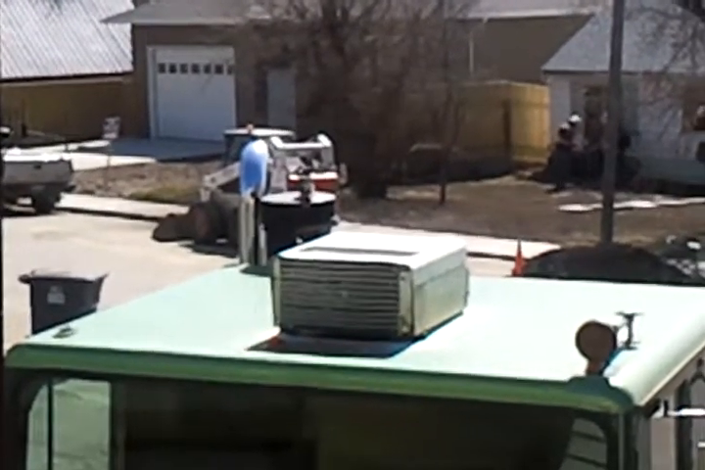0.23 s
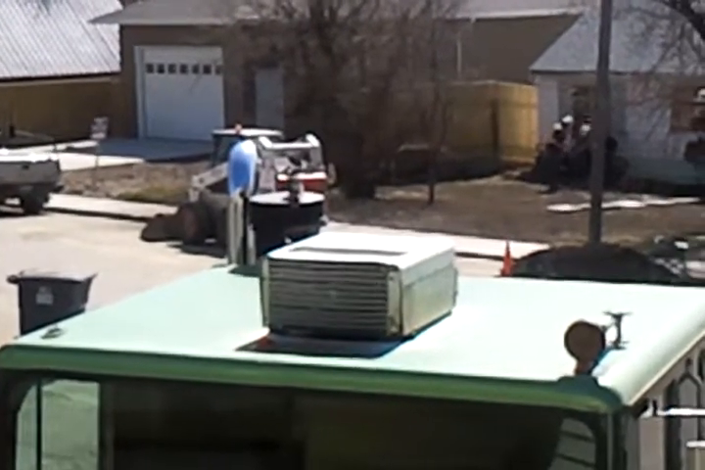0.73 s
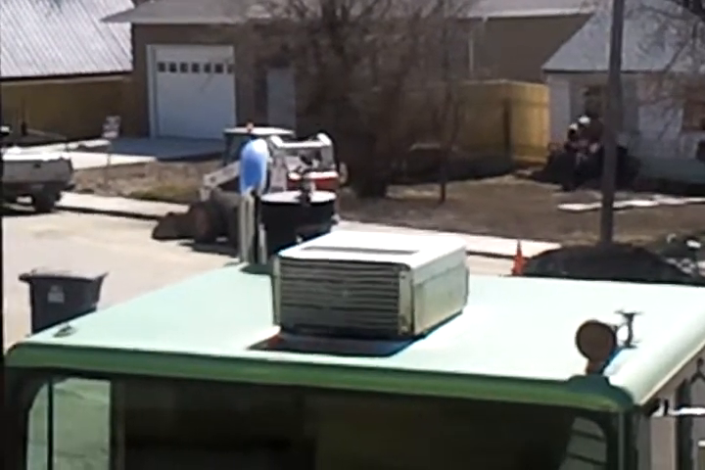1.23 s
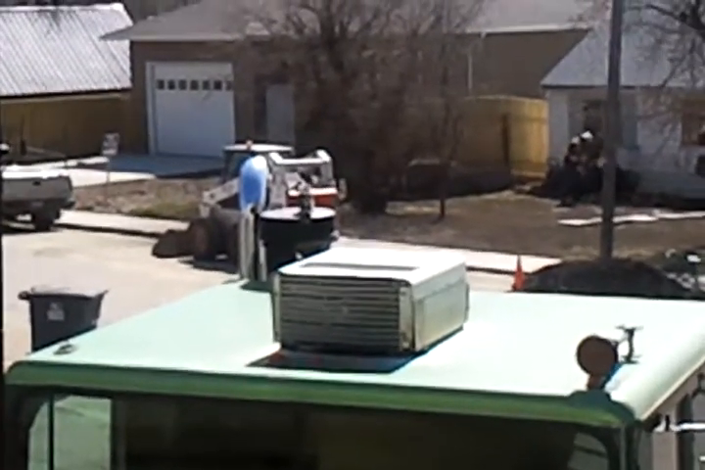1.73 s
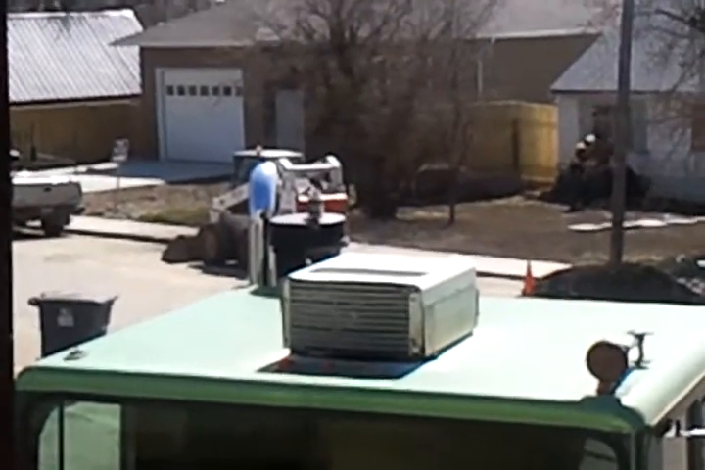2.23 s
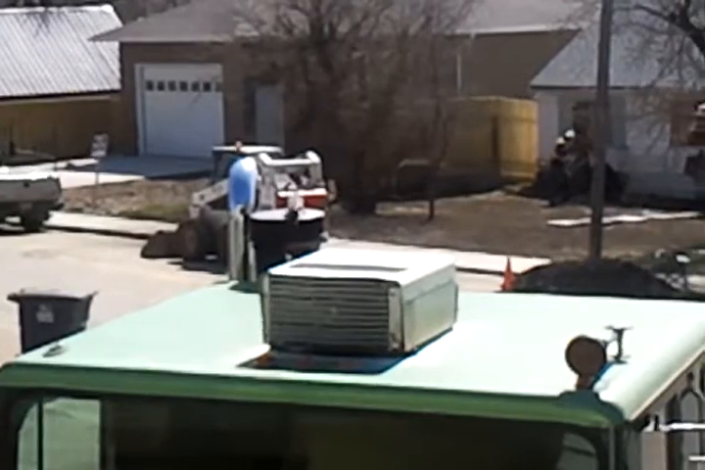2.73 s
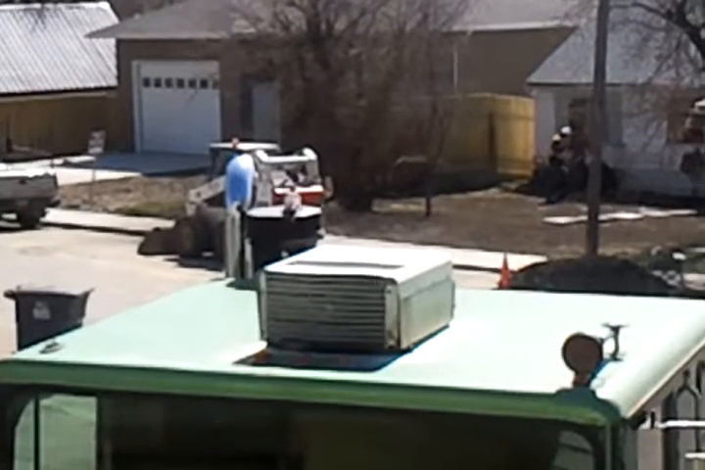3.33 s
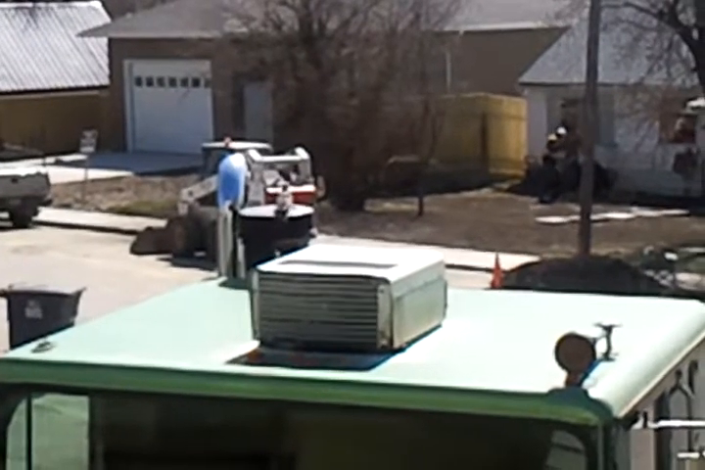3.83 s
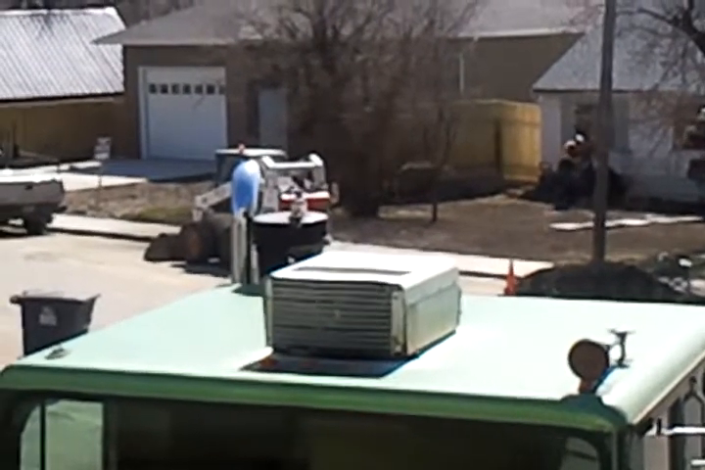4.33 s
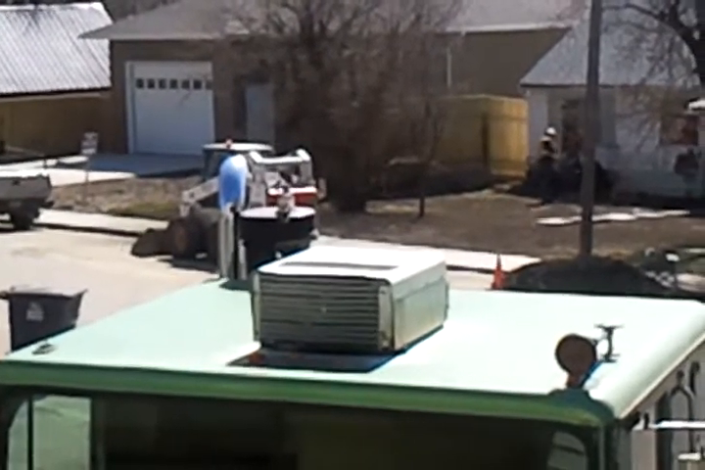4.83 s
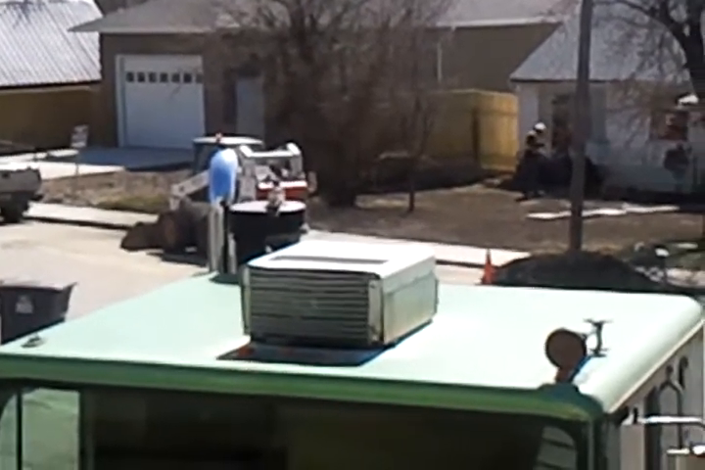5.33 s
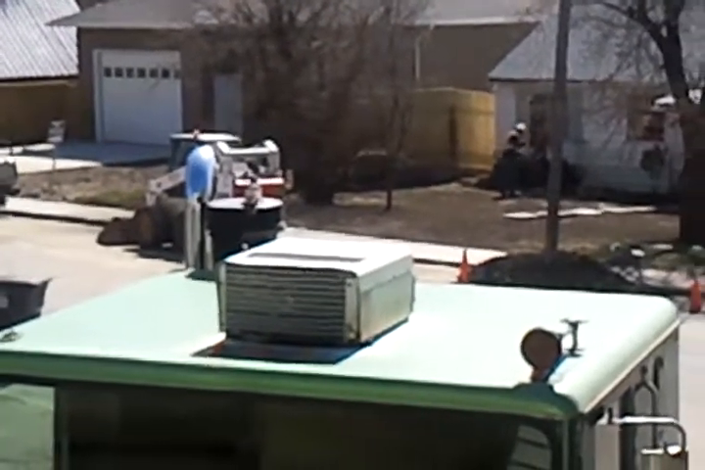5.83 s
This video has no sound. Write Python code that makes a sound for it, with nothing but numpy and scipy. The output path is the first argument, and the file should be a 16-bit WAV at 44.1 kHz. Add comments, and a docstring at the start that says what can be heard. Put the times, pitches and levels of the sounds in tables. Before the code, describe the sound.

A woodpecker taps a sheet-metal housing a few times, then hammers one loud, clanging half-second roll over distant traffic and faint birdsong.

```python
"""Distant traffic washes throughout; far birds chirp and wind puffs at the microphone now and then.
First a woodpecker pecks a sheet-metal housing on a truck roof: bright noise ticks plus small ringing modes.
Late echoes trail the two loudest pecks; feet shift with faint ticks; a short dry click follows at 2 s.
At 2.7 s it drums one loud half-second roll: each stroke rings the panel modes, a dense clang and a crack.
A faint peck comes after the roll. Roll and pecks echo from the ground and the house fronts."""
import sys
import numpy as np
from scipy import signal
from scipy.fft import rfft, irfft
from scipy.io import wavfile
from scipy.ndimage import uniform_filter1d

SR = 44100
rng = np.random.default_rng(int(sys.argv[2]) if len(sys.argv) > 2 else 0)


def unload_audio(sound):
    """Save the sound as a 16-bit wav file, at the path given as the first command line argument."""
    columns = np.transpose(np.atleast_2d(sound))
    # keep every value between -1 and 1, then stretch to whole-number steps
    steps = np.round(np.clip(columns, -1, 1) * 32767)
    wavfile.write(sys.argv[1], SR, steps.astype(np.int16))


N = 268172
TIME = np.arange(N) / SR
RING_TIME = TIME[:SR]   # each strike rings for 1 s at most


# Panel modes of the housing. Each row: frequency in Hz, relative level in dB, t60 in s.
PANEL_MODES = [(425, -39, 0.25), (570, -37.5, 0.7), (632, -36.5, 0.6), (661, -39, 0.5), (777, -34.6, 0.65),
               (831, -39.3, 0.65), (861, -33, 0.6), (943, -38, 0.8), (978, -43, 0.7), (1003, -40.6, 0.8),
               (1187, -40.5, 0.65), (1283, -34.5, 0.7), (1321, -24.5, 0.33), (1343, -27, 0.37),
               (1521, -28, 0.33), (1669, -40.5, 0.4), (1793, -31, 0.5), (1850, -29, 0.32),
               (2121, -31, 0.24), (2466, -39.5, 0.4), (2508, -40, 0.32), (2845, -45, 0.35),
               (3255, -51, 0.5), (3671, -44, 0.33), (4205, -41, 0.2), (4676, -50, 0.22), (5150, -53, 0.16),
               (5672, -55, 0.3), (5990, -56, 0.3), (6419, -53, 0.33)]
# Spectrum of its dense weaker modes. Each row: frequency in Hz, relative density in dB per Hz.
CLANG_SPECTRUM = [(250, -14.5), (400, -5), (500, -13), (650, -4.5), (900, -8), (1100, -9.5), (1600, -5),
                  (1900, -3.5), (2300, -7), (3200, -19), (4200, -17.5), (6500, -35.5), (7500, -23.5)]
# Colour of beak noise, in strokes and pecks. Each row: frequency in Hz, relative density in dB per Hz.
BEAK_SPECTRUM = [(1200, -25.5), (2000, -8), (2400, -8), (2950, -8), (3400, -7.5), (4000, 0.5), (5100, 2),
                 (5900, 0.5), (6400, -1), (6900, -2.5), (7600, -26), (9000, -16)]


def drum_roll(panel_db=-1.0, treble_db=1.5, clang_db=-30.5, scatter_db=-35.0, crack_db=-42.5,
              crack_t60_s=0.14, panel_rise_s=0.003, contact_rise_s=0.00074, valley_db=-10.0, cluster_hz=52.7):
    """Every stroke hits the same spot, so its ring adds to or cancels what still rings from earlier ones."""
    mode_hz, mode_db, t60_s = np.transpose(PANEL_MODES)
    # neighbouring modes start in opposite directions, so close pairs beat
    turn = np.arange(len(mode_hz)) / 2 + rng.normal(0, 0.12, len(mode_hz))
    decays = np.array([fade(t60) for t60 in t60_s])
    modes = decays * np.sin(2 * np.pi * (mode_hz[:, None] * RING_TIME + turn[:, None]))
    # a harder contact mostly feeds the high modes: 0 up to 1500 Hz, 1 from 6000 Hz
    high = np.clip(np.log(mode_hz / 1500) / np.log(4), 0, 1)
    clang = clustered(CLANG_SPECTRUM, valley_db, cluster_hz)
    crack_spectrum = clustered(BEAK_SPECTRUM, valley_db / 2, cluster_hz)
    weak_modes = from_db(clang_db) * dense_ring(clang)
    build_up = 1 - np.exp(-RING_TIME / panel_rise_s)   # bending waves need a moment to fill the box
    contact = 1 - np.exp(-RING_TIME / contact_rise_s)
    out = np.zeros(N)
    for start_s, force_db, bright_db in strokes():
        treble = high * (treble_db + bright_db + rng.normal(0, 1.2, len(mode_hz)))
        panel = from_db(panel_db + mode_db + treble) @ modes
        scatter = from_db(scatter_db) * dense_ring(clang)   # the beak never lands quite alike
        crack = from_db(crack_db + bright_db) * noise(crack_spectrum, size=SR) * fade(crack_t60_s)
        ring = build_up * (panel + weak_modes + scatter)
        add(out, start_s, from_db(force_db) * ring + contact * crack)
    return out


# Beak strokes, about 23 a second and quickening slightly. Each row: start in seconds, force in dB.
ROLL_STROKES = [(2.7378, 0.5), (2.7825, -1.5), (2.8271, -1.5), (2.8710, 0), (2.9128, -2), (2.9566, 0.5),
                (2.9987, 0), (3.0410, -0.5), (3.0835, -2.5), (3.1265, 0), (3.1695, -2.5), (3.2104, -1.5),
                (3.2510, -0.5)]


def strokes(bright_db=1.0, glancing_db=-10.5, glancing_from=9):
    """Start, force and brightness of each stroke; late in the roll every other one lands duller."""
    rows = []
    for k, (start_s, force_db) in enumerate(ROLL_STROKES):
        glancing = k >= glancing_from and k % 2 == 1
        rows.append((start_s, force_db, bright_db + glancing_db * glancing))
    return rows


def clustered(spectrum, valley_db, width_hz):
    """The weak modes crowd around the panel modes and thin out between them."""
    hz = np.geomspace(spectrum[0][0], spectrum[-1][0], num=900)
    distance_hz = np.min(np.abs(hz[:, None] - np.array(PANEL_MODES)[:, 0]), axis=1)
    # width_hz holds at 1 kHz and grows with the root of frequency
    near = np.exp(-(distance_hz / (width_hz * np.sqrt(hz / 1000))) ** 2)
    return np.c_[hz, at_hz(spectrum, hz) + valley_db * (1 - near)]


# Decay of the dense modes. Each row: frequency in Hz, t60 in s.
CLANG_DECAY = [(400, 0.74), (1000, 0.98), (2000, 0.42), (4000, 0.52), (7000, 0.23)]


def dense_ring(spectrum):
    """Close-packed modes, each frequency band dying at its own rate."""
    modes = rfft(noise(spectrum, size=SR))
    hz = np.arange(SR // 2 + 1)
    edges_hz = np.geomspace(150, 12000, 14)
    out = np.zeros(SR)
    for low, high in zip(edges_hz, edges_hz[1:]):
        band = irfft(modes * (hz >= low) * (hz < high), SR)
        out += band * fade(at_hz(CLANG_DECAY, np.sqrt(low * high)))
    return out


# Pecks, and the late echoes that follow the two loudest at 1.015 and 1.4716 s.
# Each row: start in seconds, relative level in dB.
PECKS_AND_LATE_ECHOES = [(0.102, -25), (0.414, -9), (0.629, -23.5), (0.725, -21.5), (0.842, -20),
                         (0.928, -18), (1.015, -2), (1.067, -17.5), (1.125, -22.5), (1.4716, -5),
                         (1.5997, -21.5), (2.579, -19.5), (3.601, -29)]
# Small, high modes of a light peck. Each row: frequency in Hz, width in Hz (wider dies sooner),
# relative level in dB.
SMALL_MODES = [(2394, 11, 2), (2420, 53, -19), (2920, 100, 8.5), (3500, 5, -13.5), (3920, 46, -3.5),
               (3700, 30, 6), (4460, 36, -38), (4960, 59, 0), (5530, 28, 3), (6170, 67, 4),
               (6500, 21, -3.5), (6640, 18, -20)]


def pecks(tick_db=-23.5, ring_db=-41.0, peck_t60_s=0.1, ring_longer=1.46, contact_rise_s=0.00071,
          snap_gain=0.86, snap_s=0.0018, click_at_s=2.0, click_db=-6, click_t60_s=0.0076):
    """A light touch gives a bright tick and a short ring; late echoes and the click are made alike."""
    sounds = [(start_s, db, peck_t60_s) for start_s, db in PECKS_AND_LATE_ECHOES + claw_ticks()]
    sounds.append((click_at_s, click_db, click_t60_s))
    snap = 1 + snap_gain * np.exp(-RING_TIME / snap_s)   # the first instant is harder than the ring
    contact = 1 - np.exp(-RING_TIME / contact_rise_s)
    out = np.zeros(N)
    for start_s, db, t60_s in sounds:
        ring = np.zeros(SR)
        for hz, width_hz, mode_db in SMALL_MODES:
            gain = from_db(mode_db + rng.normal(0, 2.5))
            tone = np.sin(2 * np.pi * (hz * RING_TIME + rng.random()))
            ring += gain * tone * fade(ring_longer * t60_s * np.sqrt(40 / width_hz))
        tick = noise(BEAK_SPECTRUM, size=SR) * fade(t60_s) * snap
        tick_and_ring = from_db(tick_db) * tick + from_db(ring_db) * ring
        add(out, start_s, from_db(db) * contact * tick_and_ring)
    return out


def claw_ticks(count=6, from_s=0.75, to_s=0.85, level_db=-24.5, scatter_db=2.5):
    """Faint, uneven ticks as the bird shifts its feet: (start in seconds, relative level in dB)."""
    step, strength = rng.uniform(-1, 1, (count, 2)).T
    start_s = np.linspace(from_s, to_s, count) + step * (to_s - from_s) / count / 2
    return list(zip(start_s, level_db + scatter_db * strength))


# Echoes from the ground and the house fronts. Each row: delay in seconds, relative level in dB.
STREET_ECHOES = [(.0151, -10), (.052, -9.5), (.087, -16), (.128, -14)]


def street(x, echo_db=-5.0, wall_hz=4000.0):
    """A few echoes come back from the ground and the houses, dulled by a gentle lowpass."""
    lowpass = signal.butter(1, wall_hz, fs=SR, output="sos")
    dull = signal.sosfilt(lowpass, x + 1e-18)
    out = x.copy()
    for delay_s, db in STREET_ECHOES:
        add(out, delay_s, from_db(db + echo_db) * dull)
    return out


# A small bird's call, a flick up that falls to a lower note. Each row: seconds into the unstretched call,
# pitch as a share of the call's reference pitch, relative level in dB.
CALL_CONTOUR = [(0, .82, -13), (0.018, .95, -2), (.03, 0.91, -5), (.042, 1.17, -7), (.055, 0.95, -8),
                (.075, .79, 2), (0.093, .79, -1.5), (.12, 0.56, -17)]
# Its calls. Each row: start in seconds, reference pitch in Hz, stretch of the contour, relative level in dB.
CALLS = [(-.05, 4500, 1.2, -47), (1.838, 5140, 0.87, -51.5), (3.815, 4450, 0.38, -37.5),
         (3.868, 4290, 0.246, -40.5), (4.775, 4670, 0.94, -51.5), (5.046, 4690, 0.6, -51.5),
         (5.578, 4650, 0.82, -52)]
# Soft whistles of other birds. Each row: start in seconds, length in seconds, first pitch in Hz,
# relative level in dB.
SOFT_WHISTLES = [(0.619, 0.0514, 2850, -46), (.765, 0.069, 2880, -45.5), (1.421, 0.059, 2750, -49),
                 (4.42, 0.43, 3840, -56)]


def birds(call_waver_hz=138.0, whistle_waver_hz=152.3, whistle_sag=0.049, scatter_db=-1.5, yard_t60_s=0.44):
    """Two-note calls and slightly sinking whistles, smeared by trees and walls on their long way."""
    out = np.zeros(N)
    shape_s, shape_ratio, shape_db = np.transpose(CALL_CONTOUR)
    for start_s, top_hz, stretch, db in CALLS:
        t = np.arange(int(shape_s[-1] * stretch * SR)) / SR / stretch
        level = from_db(db + np.interp(t, shape_s, shape_db))
        pitch_hz = top_hz * np.interp(t, shape_s, shape_ratio)
        add(out, start_s, level * whistle(pitch_hz, call_waver_hz))
    for start_s, length_s, hz, db in SOFT_WHISTLES:
        along = np.linspace(0, 1, int(length_s * SR))
        level = from_db(db) * np.sin(np.pi * along)
        pitch_hz = hz * (1 - whistle_sag * along)
        add(out, start_s, level * whistle(pitch_hz, whistle_waver_hz))
    yard = rng.standard_normal(SR) * fade(yard_t60_s)
    smeared = signal.fftconvolve(out, yard / np.linalg.norm(yard))[:N]
    return out + from_db(scatter_db) * smeared


def whistle(pitch_hz, waver_hz):
    """A near-pure tone that wavers about its pitch; waver_hz is the rms deviation."""
    waver = waver_hz * rms_one(uniform_filter1d(rng.standard_normal(len(pitch_hz)), size=60))
    return np.sin(2 * np.pi * np.cumsum(pitch_hz + waver) / SR)


# Gusts. Each row: peak time in seconds, length in seconds (between the 1/e points of power), level in dB.
WIND_PUFFS = [(0.005, 0.051, -41.5), (0.242, 0.02, -34.5), (0.311, 0.039, -39), (1.074, 0.048, -41),
              (1.396, 0.065, -41), (2.045, 0.043, -30.5), (2.163, 0.028, -29.5), (2.37, 0.12, -36),
              (3.557, 0.031, -32), (3.911, 0.1, -38), (5.8, .016, -44)]
# Light breeze between the gusts. Each row: time in seconds, level in dB.
LIGHT_BREEZE = [(0, -52), (.2, -47), (.5, -69), (1.6, -67), (2.2, -43.5), (2.8, -56.5), (4.6, -69),
                (4.95, -49), (5.3, -63), (5.55, -51), (6.08, -76)]


def wind():
    """Breeze and puffs buffet the microphone with a low flutter."""
    power = from_db(np.interp(TIME, *np.transpose(LIGHT_BREEZE))) ** 2
    for peak_s, length_s, db in WIND_PUFFS:
        power += from_db(db) ** 2 * np.exp(-(2 * (TIME - peak_s) / length_s) ** 2)
    # Hz, relative dB per Hz
    flutter_spectrum = [(35, -9.0), (70, -0.5), (100, -1.5), (170, -7.5), (280, -12.0), (450, -34.0),
                        (900, -38.5)]
    flutter = noise(flutter_spectrum, size=N)
    # even out the noise's own swells so the gusts and breeze set the level
    evened = flutter / np.sqrt(uniform_filter1d(flutter ** 2, size=1500) + 1e-6)
    return np.sqrt(power) * evened


# Distant traffic. Each row: frequency in Hz, relative density in dB per Hz.
ROAD_SPECTRUM = [(15, -43.5), (25, -17.5), (225, -0.5), (408, -4.5), (557, -0.5), (674, -5.5), (856, 0.5),
                 (1140, -1.5), (1410, 0), (1840, -2.5), (2510, -16), (3760, -19), (4550, -24),
                 (6360, -25.5), (7520, -39), (9780, -88), (16500, -120)]
# Its swell. Each row: time in seconds, relative road rumble in dB, relative tyre hiss in dB.
ROAD_SWELL = [(0, 1.5, 3), (.6, 1.5, 0), (1.7, 1.5, 1), (2.7, 1, -1), (3.95, 1, 5.5), (4.7, -0.5, -1),
              (5.3, 0.5, -4), (6.08, 1.5, -2)]


def traffic(level_db=-44.0, tyre_low_hz=1150.0, tyre_high_hz=2600.0):
    """Far road noise whose tyre band swells as cars go by."""
    swell_s, rumble_points, tyre_points = np.transpose(ROAD_SWELL)
    rumble_db = np.interp(TIME, swell_s, rumble_points)
    tyre_db = np.interp(TIME, swell_s, tyre_points)
    road = noise(ROAD_SPECTRUM, size=N)
    tyre_band = signal.butter(2, [tyre_low_hz, tyre_high_hz], "band", fs=SR, output="sos")
    tyres = signal.sosfiltfilt(tyre_band, road)
    return from_db(level_db) * (from_db(rumble_db) * (road - tyres) + from_db(tyre_db) * tyres)


def from_db(db):
    """Decibels to gain."""
    return 10 ** (np.asarray(db) / 20)


def rms_one(x):
    """Scale to unit rms."""
    return x / np.sqrt(np.mean(x ** 2) + 1e-20)


def at_hz(points, hz):
    """Read a table on a log-frequency axis."""
    known_hz, value = np.transpose(points)
    return np.interp(np.log(np.maximum(hz, 1)), np.log(known_hz), value)


def noise(spectrum, size):
    """Noise of a given colour, rms 1, falling away beyond the ends of its table."""
    hz = np.arange(size // 2 + 1) * SR / size + 1
    low_end = 1 / (1 + (spectrum[0][0] / hz) ** 4)
    high_end = 1 / (1 + (hz / spectrum[-1][0]) ** 16)
    phase = np.exp(2j * np.pi * rng.random(len(hz)))
    return rms_one(irfft(from_db(at_hz(spectrum, hz)) * low_end * high_end * phase, size))


def fade(t60_s):
    """Free decay of a struck part, 60 dB in t60_s (3 ms at least)."""
    return from_db(-60 * RING_TIME / max(t60_s, 0.003))


def add(track, start_s, sound):
    """Mix a sound into the track at start_s, cutting what falls outside."""
    start = round(start_s * SR)
    low, high = max(start, 0), min(start + len(sound), N)
    track[low:high] += sound[low - start:high - start]


def scene():
    """The woodpecker on its housing, in the open street."""
    woodpecker = street(drum_roll() + pecks())
    return (woodpecker + birds() + wind() + traffic())[None]


def record(dry, cutoff_hz=7900):
    """The recorder keeps only the band below its steep cut-off."""
    return signal.sosfilt(signal.butter(14, cutoff_hz, fs=SR, output="sos"), dry)


dry = scene()
out = record(dry)
unload_audio(out)
```